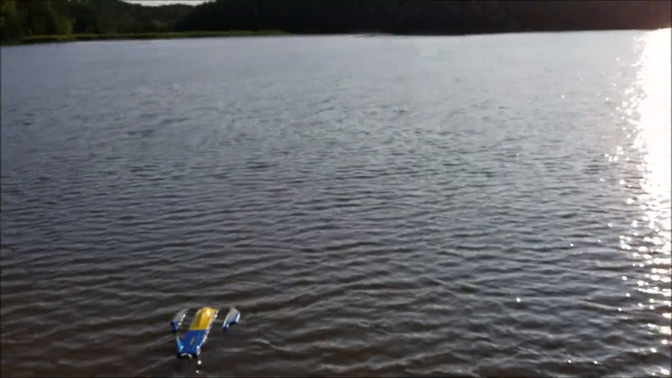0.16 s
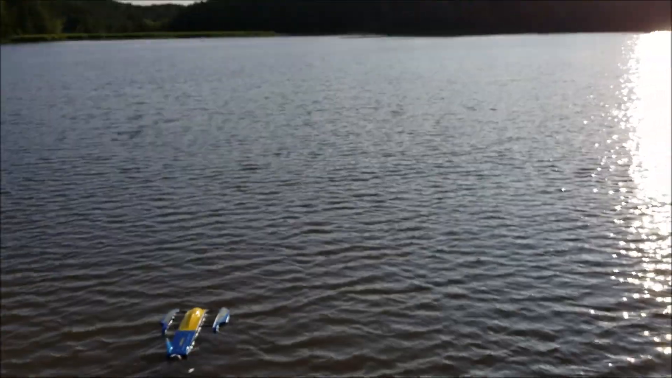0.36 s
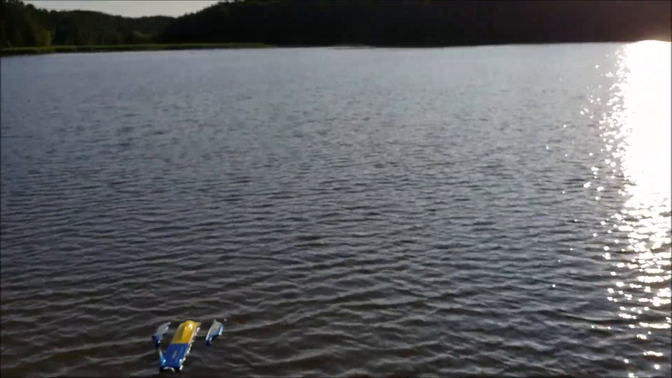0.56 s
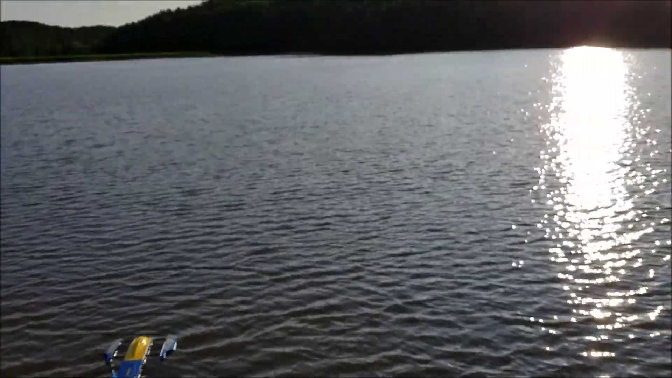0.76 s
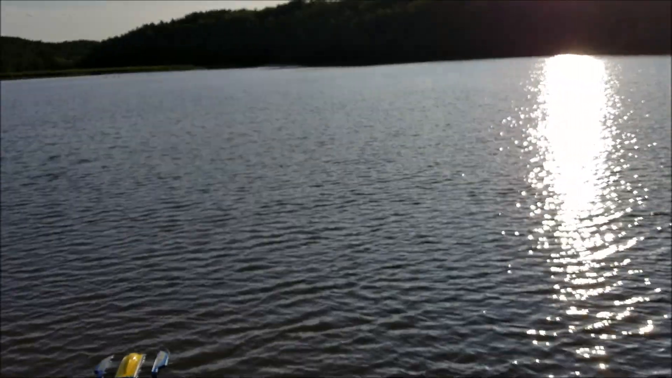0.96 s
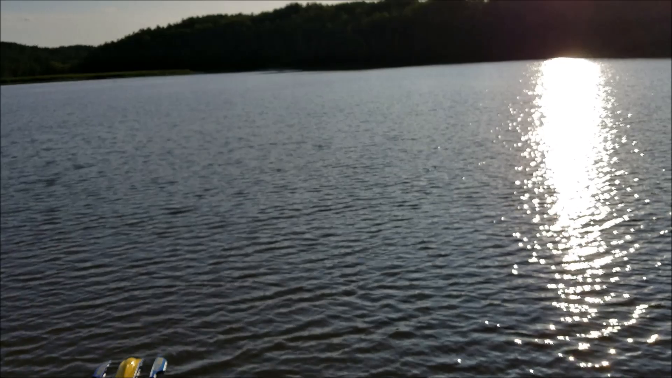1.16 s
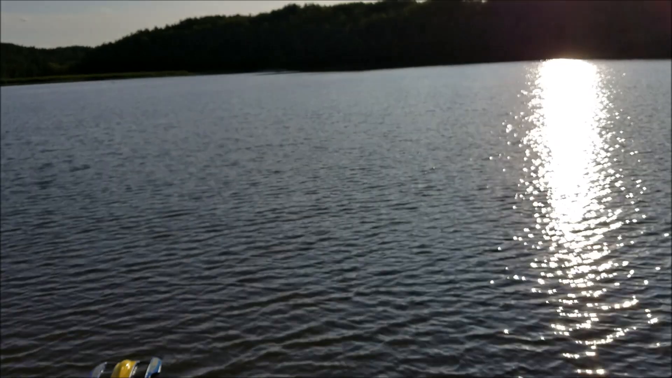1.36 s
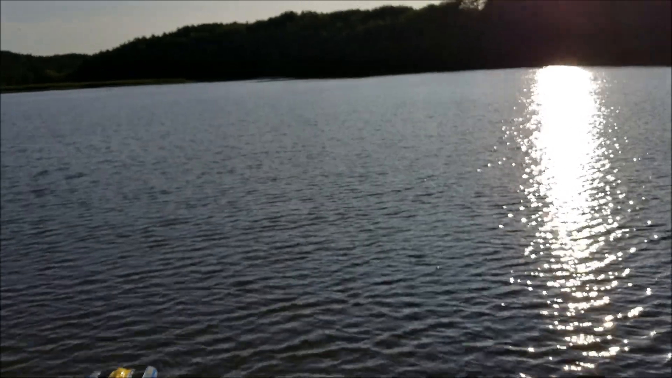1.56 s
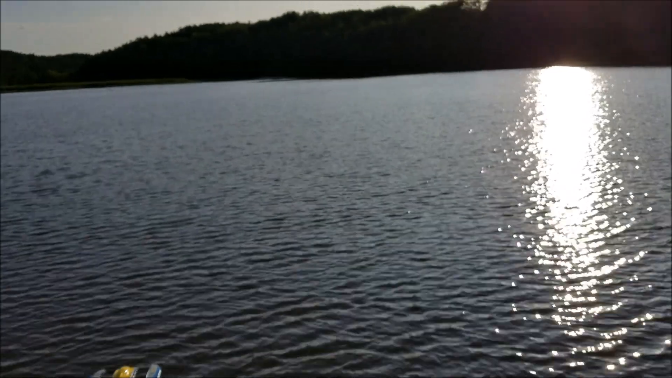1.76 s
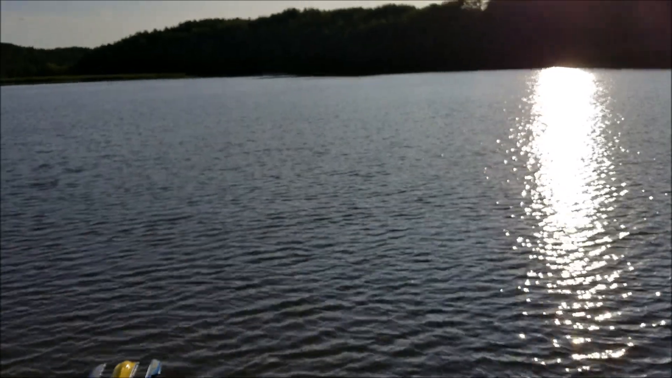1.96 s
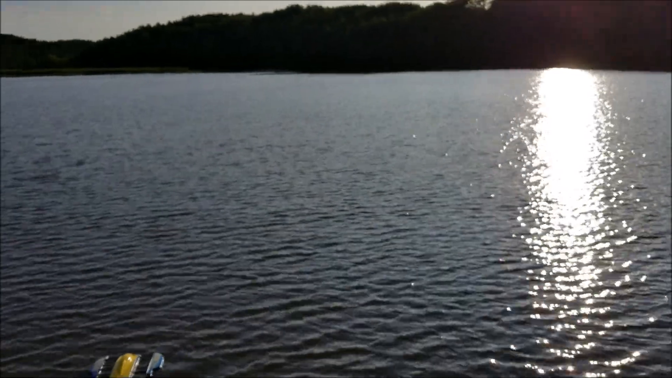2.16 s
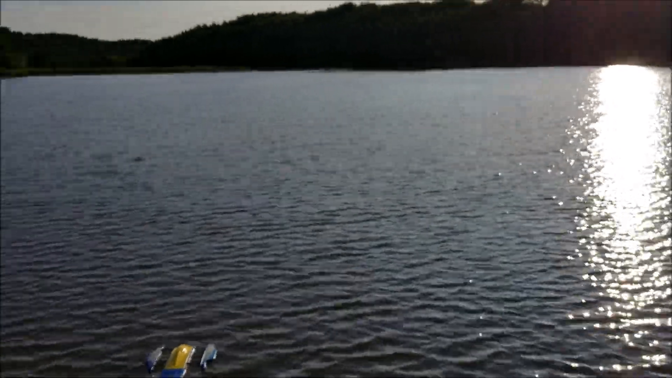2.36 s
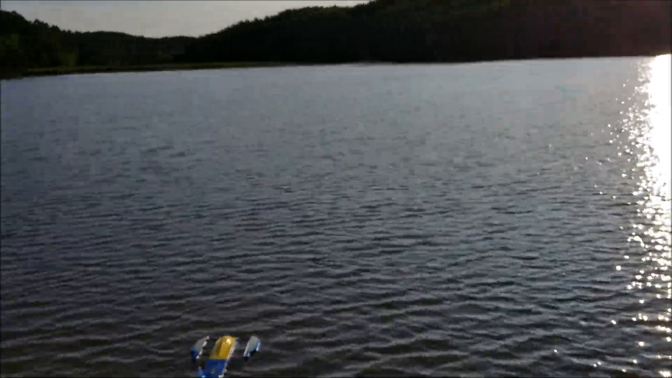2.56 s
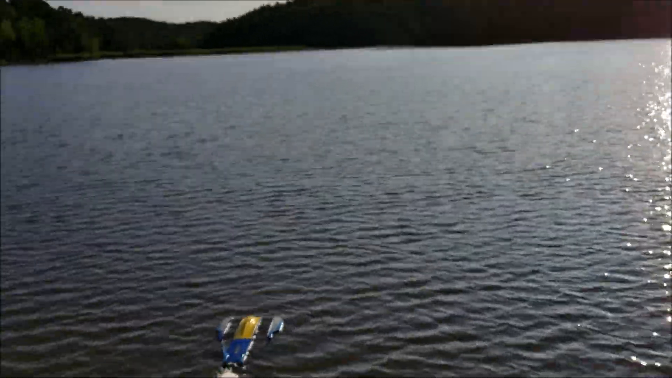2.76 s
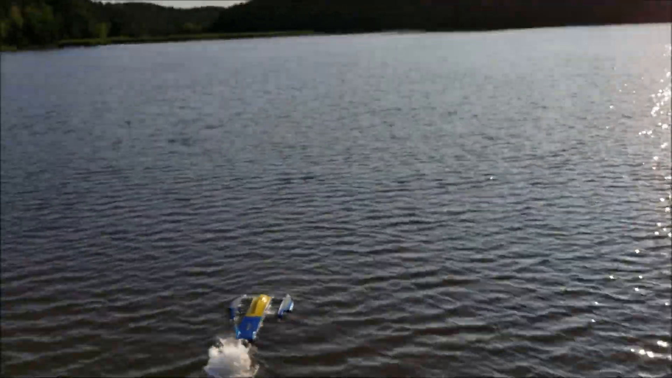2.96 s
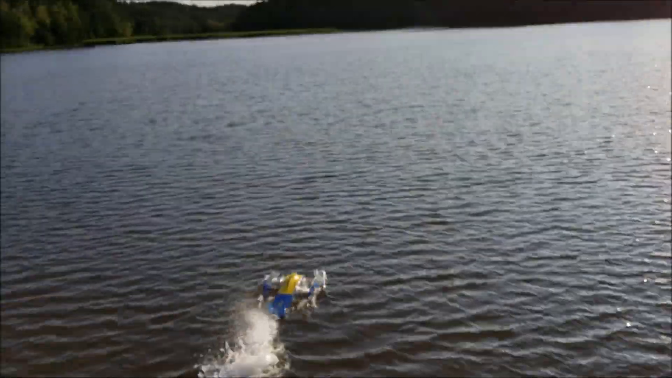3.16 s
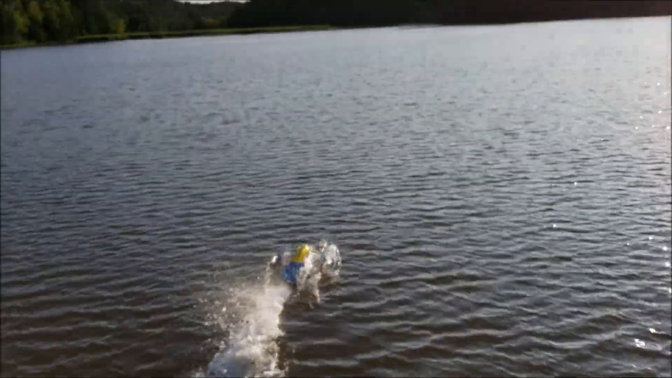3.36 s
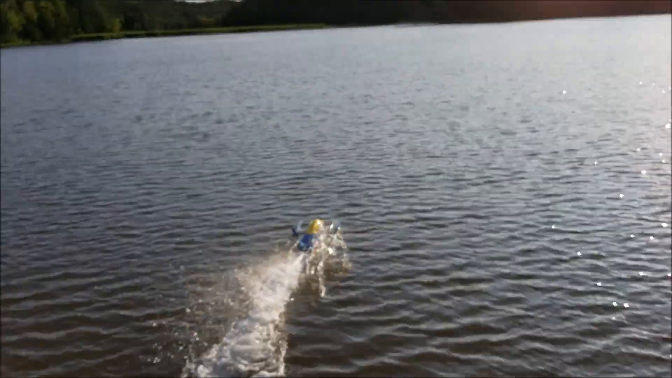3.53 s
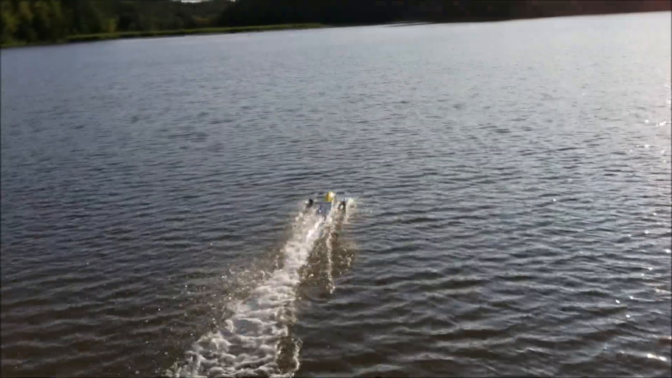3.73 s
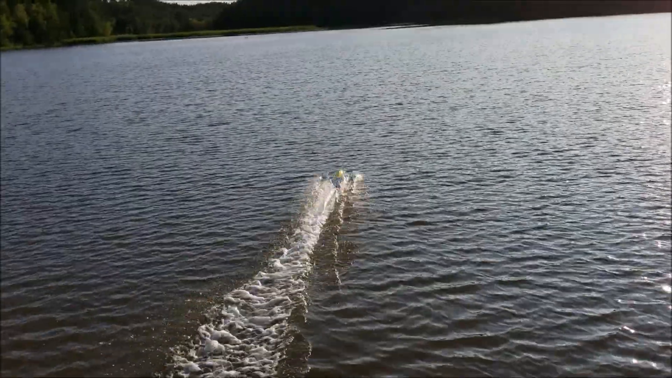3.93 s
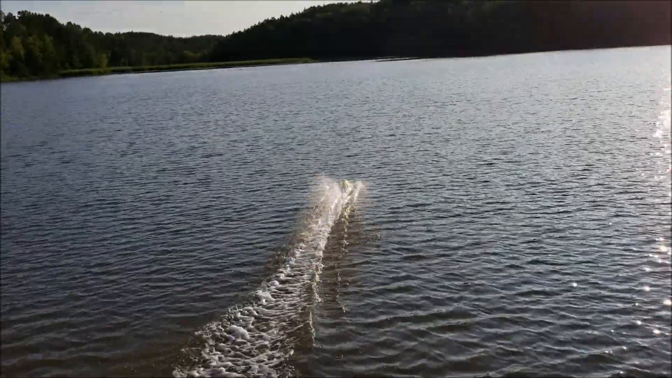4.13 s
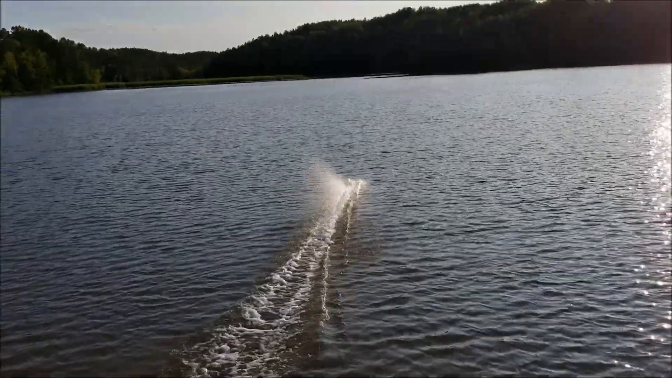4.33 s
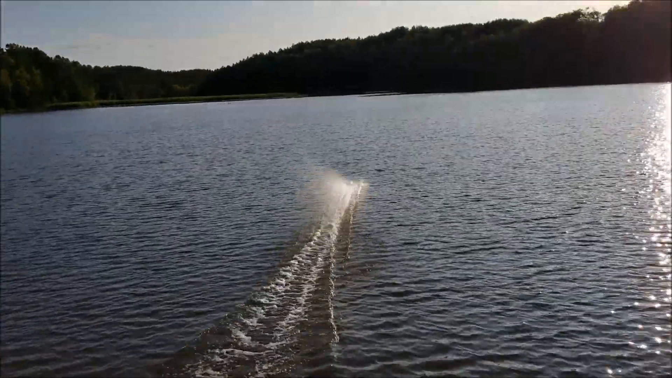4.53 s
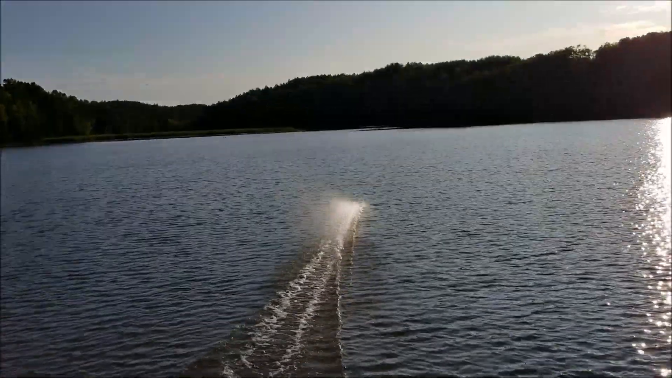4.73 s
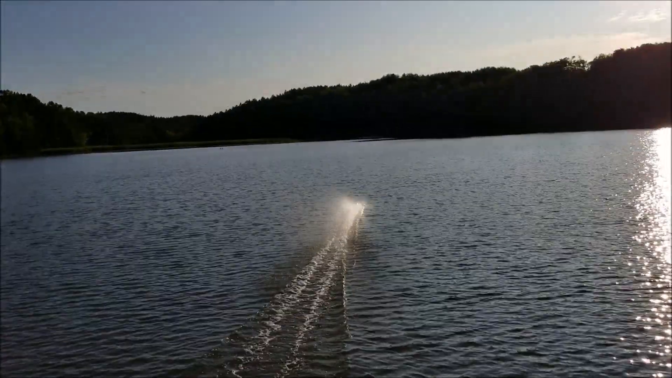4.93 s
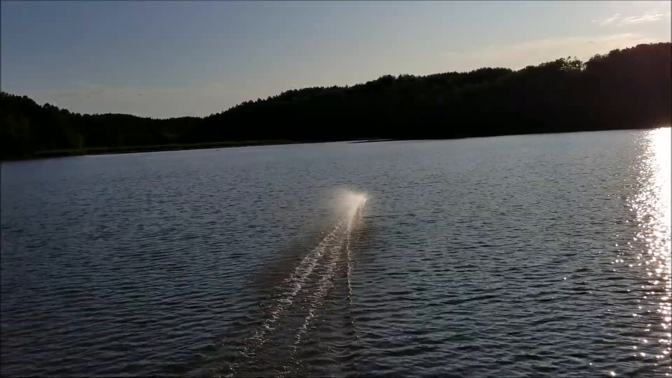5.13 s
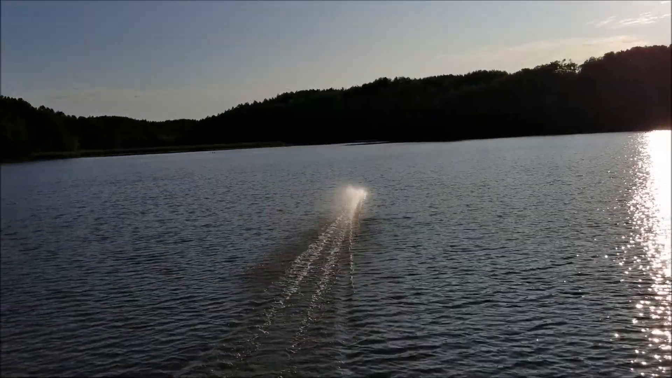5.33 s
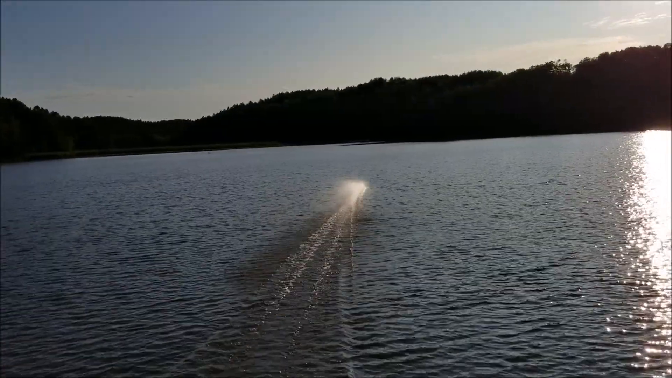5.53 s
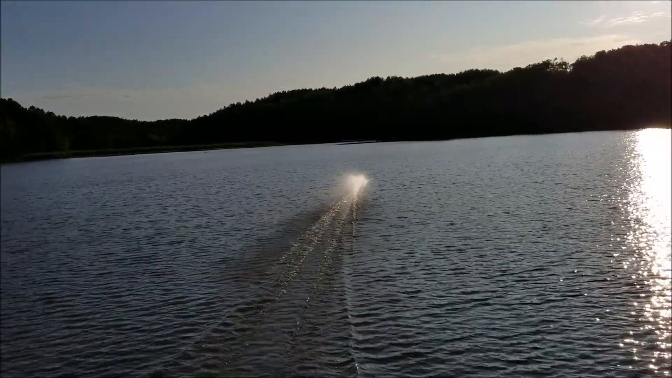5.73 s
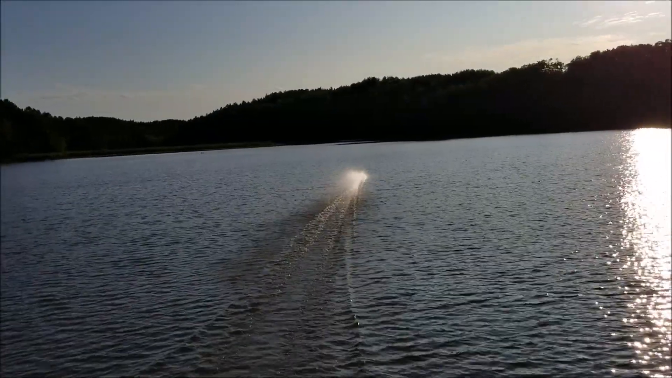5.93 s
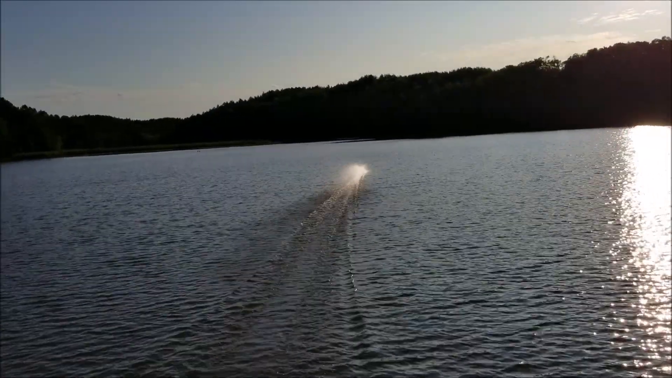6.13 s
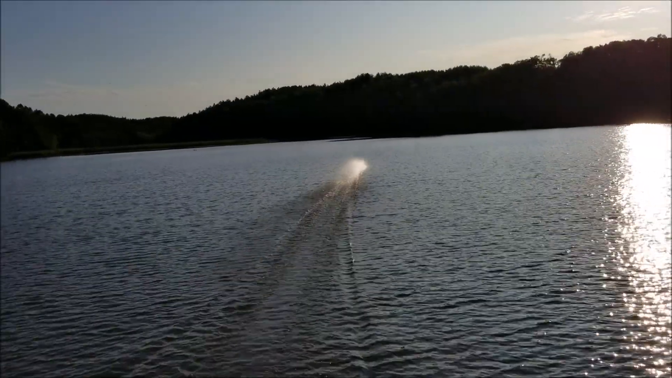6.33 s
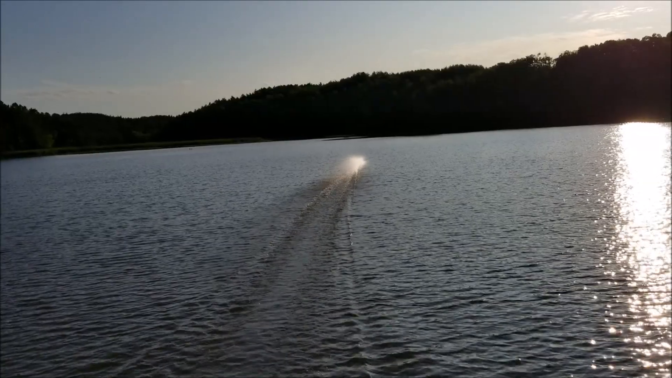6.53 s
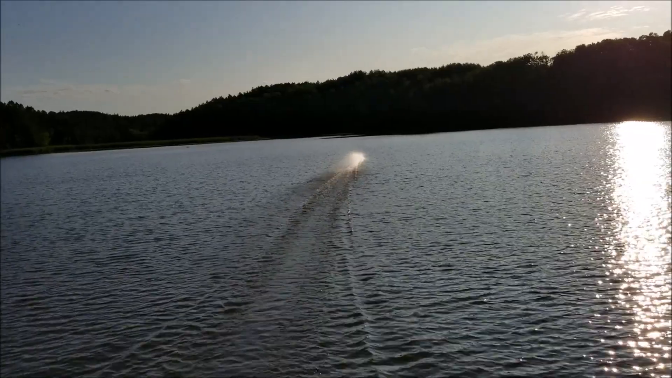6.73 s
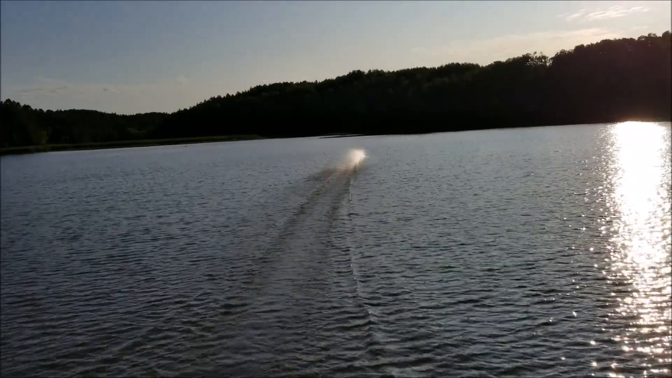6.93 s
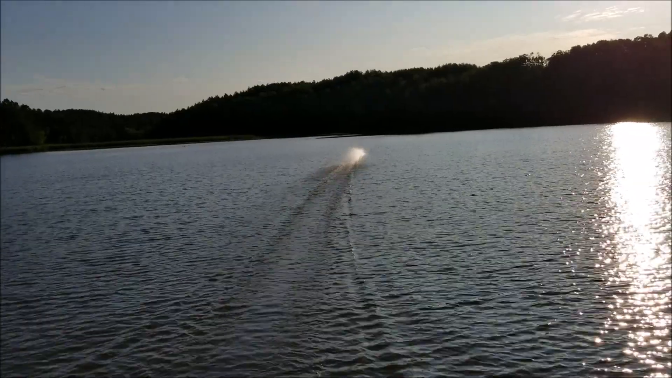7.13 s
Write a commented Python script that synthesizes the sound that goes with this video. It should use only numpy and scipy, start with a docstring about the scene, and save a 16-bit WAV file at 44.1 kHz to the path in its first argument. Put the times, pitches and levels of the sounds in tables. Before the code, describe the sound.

On a calm lake shore, light low wind, bush crickets and a few cricket chirps and ripple plops are very faint. A small model boat starts with a sharp splash close by, gulps and churns, growls hard for half a second, then jumps to a high, buzzing whine with roaring water and hissing spray, thinning as it speeds away. Stereo outdoor microphone on the bank.

```python
"""Light wind rumbles on a lake shore: filtered noise, with swept tones for insects and short bursts for ripples.
A model speedboat starts with a splash, churning the water in noise pulsed by its blades; air pockets ring as
gliding sines and droplets as tiny damped rings. The throttle opens and the propeller growls in harmonics.
The hull lifts onto the plane and whines away over pulsed roar, under a tail of spray, as its whistle fades."""
import sys
import numpy as np
from scipy import signal
from scipy.fft import rfft, irfft, next_fast_len
from scipy.io import wavfile
from scipy.ndimage import uniform_filter1d, map_coordinates

SR = 44100
rng = np.random.default_rng(int(sys.argv[2]) if len(sys.argv) > 2 else 0)


def wav_record(signal):
    """Record a signal, one row per channel, as 16-bit PCM in the file named by sys.argv[1]."""
    frames = np.transpose(np.atleast_2d(signal))
    bounded = np.clip(frames, -1, 1)
    # unit amplitude maps onto the largest positive 16-bit level
    quanta = np.round(bounded * 32767).astype(np.int16)
    wavfile.write(sys.argv[1], SR, quanta)


N = 317079
T = np.arange(N) / SR


def amp(db):
    """Decibels to gain."""
    return 10 ** (np.asarray(db) / 20)


def unit(x):
    """Scale to rms 1."""
    return x / np.sqrt(np.mean(x ** 2) + 1e-20)


def along(points, hz):
    """Read (frequency_hz, value) points on a log frequency axis."""
    f, v = np.transpose(points)
    return np.interp(np.log(hz + 1), np.log(f + 1), v)


def curves(rows):
    """One value per sample for each column after the time."""
    s, *cols = np.transpose(rows)
    return [np.interp(T, s, c) for c in cols]


def ramp(start_s, length_s):
    """Rise from 0 to 1 in a straight line."""
    return np.clip((T - start_s) / length_s, 0, 1)


def swell(centre_s, half_s):
    """A bell-shaped swell."""
    return np.exp(-.5 * np.minimum(((T - centre_s) / half_s) ** 2, 100))


def wobble(rate):
    """A smooth random curve with rate knots a second."""
    knots = rng.standard_normal(int(N * rate / SR) + 4)
    return map_coordinates(knots, [T * rate])


def turning(hz):
    """Phase of something turning at hz, in radians."""
    return 2 * np.pi * np.cumsum(hz) / SR


def filtered(x, response):
    """Filter x by a response given as a function of frequency."""
    size = next_fast_len(N + 8192)
    return irfft(rfft(x, size) * response(np.fft.rfftfreq(size, 1 / SR)), size)[..., :N]


def noise(patchy_db):
    """Two white noises sharing patches of random gain in time and frequency."""
    z = signal.stft(rng.standard_normal((2, N)), nperseg=512)[2]
    field = uniform_filter1d(rng.standard_normal(z.shape[1:]), size=7, axis=0)
    field = uniform_filter1d(field, size=8, axis=1)
    patches = amp(patchy_db * unit(field))
    return unit(signal.istft(z * patches)[1][:, :N])


def stereo(pair, spectrum, alike):
    """Colour two signals and mix them to a partly alike left and right, together of rms 1."""
    def response(hz):
        turn = np.arccos(np.clip(along(alike, hz), -1, 1)) / 2
        return amp(along(spectrum, hz)) * np.array([np.cos(turn), np.sin(turn)])
    mid, side = filtered(pair, response)
    return unit(np.array([mid + side, mid - side]))


def lines(phase, orders, rough, flutter):
    """Multiples of a turning phase, each shaken in size and timing, the higher ones more."""
    def shake(k):
        start = np.exp(2j * np.pi * rng.random())
        return start * (1 + rough * np.sqrt(k) * (wobble(flutter) + 1j * wobble(flutter)))
    return unit(sum(amp(db) * unit(np.real(shake(k) * np.exp(1j * k * phase))) for k, db in orders))


def splats(rows, low_hz, high_hz, t60):
    """Water slaps: noise bursts in a band that fall 60 dB in t60 seconds."""
    out, t = np.zeros(N + SR), np.arange(SR // 10) / SR
    band = signal.butter(2, [low_hz, min(high_hz, .45 * SR)], "band", fs=SR, output="sos")
    for start_s, peak_db in rows:
        burst = signal.sosfilt(band, rng.standard_normal(len(t)) * amp(-60 * t / t60))
        out[round(start_s * SR):][:len(t)] += amp(peak_db) * burst / np.abs(burst).max()
    return out[:N]


def placed(pair, lead):
    """Sound reaches the left port lead seconds before the right."""
    sides = zip(pair, (1, -1))
    return np.array([map_coordinates(x, [(T + side * lead / 2) * SR], order=5) for x, side in sides])


# likeness of left and right on the shore: frequency_hz, likeness (1 = identical)
SHORE_LIKENESS = [(35, 0.74), (90, 0.9), (300, 0.85), (1000, 0.85), (3000, 0.036)]
# strength of the breeze before its lift and wobble: time_s, level_db
WIND_STRENGTH = [(0, -50), (.4, -50), (1.45, -52), (1.9, -49), (3.7, -50.5), (4.7, -51), (5.6, -54),
                 (6.7, -49), (7.19, -51.5)]
# relative spectrum of the breeze: frequency_hz, level_db (per Hz)
WIND_SPECTRUM = [(12, -42), (20, -29), (50, -5.5), (92, -2.5), (237, -10.5), (275, -10.5), (305, -13),
                 (677, -23.5), (1010, -29.5), (1630, -34), (3000, -56.5), (3900, -67), (6600, -120)]


def wind():
    """Light wind: low noise that swells and falls, reaching the left first."""
    strength_db, = curves(WIND_STRENGTH)
    gusts = amp(strength_db + 2.5 + 1.23 * wobble(5.4))
    return placed(gusts * stereo(noise(patchy_db=1.5), WIND_SPECTRUM, SHORE_LIKENESS), lead=0.00038)


# relative spectrum of the bank's hiss: frequency_hz, level_db (per Hz)
BANK_SPECTRUM = [(800, -29), (1700, -5.5), (2600, -4.5), (4000, -1), (5300, 4), (6400, 0.5), (7400, -1),
                 (8300, 4), (9200, -19.5), (12000, -8.5), (15500, -6.5)]


def bank_hiss():
    """The bank hisses: steady bright noise."""
    return amp(-63.0) * stereo(noise(patchy_db=0.7), BANK_SPECTRUM, SHORE_LIKENESS)


# bush crickets, before the shore's tilt to the left; pitch and sweep sound 1 % lower:
# pitch_hz, strokes_per_s, sweep_hz, level_db
BUSH_CRICKETS = [(7340, 13.8, 495, -75.5), (8360, 16, -600, -75), (7910, 3.7, -61, -73.5),
                 (7800, 17, 697, -78), (5330, 46, -900, -75.5)]


def trills():
    """Bush crickets rasp steadily; every stroke sweeps through a narrow band at its own pitch and force."""
    out = np.zeros((2, N))
    for pitch_hz, rate, sweep_hz, level_db in BUSH_CRICKETS:
        stroke = np.cumsum(rate * (1 + .12 * wobble(rate))) / SR % 1
        phase = turning(pitch_hz * (1 + .008 * wobble(rate)) + sweep_hz * (stroke - .5))
        rasp = np.array([lines(phase, [(0.99, 0)], rough=1.0, flutter=260) for _ in range(2)])
        force = amp(1.2 * wobble(rate))
        out += amp(level_db) * unit(np.sin(np.pi * stroke) ** 4 * force * rasp)
    return out


# cricket chirps, level before each stroke's force and the shore's tilt: start_s, level_db, wing_strokes
CRICKET_CHIRPS = [(.285, -61, 3), (.843, -61, 3), (1.359, -61, 3), (1.81, -56.5, 3), (2.224, -61, 3),
                  (6.15, -60, 1), (6.345, -58, 1), (6.495, -58, 2), (6.853, -57, 2)]


def cricket(hz=4450, fall_hz=150, stroke_gap=.043, half=0.0054):
    """A few wing strokes to a chirp, each sliding down in pitch, the later ones on average stronger."""
    out, t = np.zeros(N + SR), np.arange(SR // 25) / SR
    u = (t - .01) / half
    for start_s, level_db, strokes in CRICKET_CHIRPS:
        for k in range(round(strokes)):
            tune, slide, force = rng.standard_normal(3)
            pitch = hz * (1 + 0.0085 * tune) - fall_hz * (1 + 0.41 * slide) * np.tanh(u / 2)
            stroke = np.exp(-u * u / 2) * np.sin(turning(pitch))
            at = round((start_s + k * stroke_gap) * SR)
            out[at:][:len(t)] += amp(level_db + 1.3 * k + force) * stroke
    return out[:N]


# ripples plop at the shore, before its tilt to the left: start_s, peak_db
RIPPLES = [(.385, -56), (.99, -56), (1.502, -61), (1.54, -59), (1.728, -51), (1.739, -50), (1.757, -54)]


def laps():
    """Ripples plop: short bursts of noise in a narrow band."""
    return splats(RIPPLES, low_hz=1200, high_hz=2460, t60=.03)


def shore():
    """Wind reaches the left first; hiss, insects and ripples are louder on the left."""
    tilt = amp([[1.0], [-1.0]])
    return wind() + (bank_hiss() + trills() + cricket() + laps()) * tilt


# the run: the motor starts to tick over, the throttle opens, the hull lifts onto the plane (s)
START_S, GO_S, LIFT_S = 2.566, 2.893, 3.545
OPEN_S, DIG_S, CLEAR_S = 0.016, 0.41, 0.021  # the throttle opens, the load builds, the blades clear the water (s)
# distance at rest (m), top speed (m/s), time constant of the acceleration (s)
START_M, TOP_M_PER_S, PICKUP_S = 3.14, 13.26, 1.0
NEAR_M = 6.51  # levels change with distance only beyond this


def speed():
    """The boat picks up speed ever more slowly towards its top (m/s)."""
    return TOP_M_PER_S * (1 - np.exp(-np.maximum(T - GO_S, 0) / PICKUP_S))


def distance():
    """It heads straight away from the shore (m)."""
    return START_M + np.cumsum(speed()) / SR


def receding(doubling_db):
    """Gain that changes by so many dB with each doubling of distance."""
    return amp(doubling_db * np.log2(np.maximum(distance() / NEAR_M, 1)))


def effort(idle_db, open_db, full_db):
    """Gain that follows the motor: ticking over, a jump as the throttle opens, then a climb to full load."""
    opening = (open_db - idle_db) * ramp(GO_S, OPEN_S)
    loading = (full_db - open_db) * ramp(GO_S, DIG_S)
    return ramp(START_S, .008) * amp(idle_db + opening + loading)


# the hull ploughs into ripples, and roar and spray surge: centre_s, gain_db, half_length_s
RIPPLE_SURGES = [(3.646, 2, 0.027), (4.306, 2.2, 0.042), (4.68, 1.5, .11), (5.99, 2.5, .06),
                 (6.346, 1.5, 0.14), (6.749, 1.5, 0.12)]


def surge():
    """Gain of the water noise as the hull meets ripples."""
    return amp(sum(db * swell(s, half) for s, db, half in RIPPLE_SURGES))


# likeness of left and right in the boat's water noise: frequency_hz, likeness (1 = identical)
BOAT_LIKENESS = [(100, 1), (600, 0.94), (2000, .9), (5000, 0.77), (14000, 0.4)]
# relative spectrum of the churn at rest: frequency_hz, level_db (per Hz)
RESTING_CHURN = [(40, -26), (100, -6.5), (330, 3.5), (550, -6.5), (1150, -8), (1550, -22), (2000, -14),
                 (2800, -18.5), (3600, -41), (9000, -45)]
# relative spectrum of the churn under load: frequency_hz, level_db (per Hz)
DRIVING_CHURN = [(40, -40), (90, -24), (150, -2.5), (310, 3.5), (480, -2.5), (800, -3.5), (1200, -11.5),
                 (1450, -19), (1850, -6), (2400, -14), (3300, -32), (7500, -21.5), (10000, -43)]


def churn(beats, load):
    """Blades churn the water: steady noise at rest, noise pulsed at each blade pass under load."""
    resting = stereo(noise(patchy_db=4.0), RESTING_CHURN, BOAT_LIKENESS)
    driving = stereo(beats * noise(patchy_db=2.5), DRIVING_CHURN, BOAT_LIKENESS)
    level = effort(idle_db=-40.5, open_db=-30, full_db=-24.5)
    return level * (np.sqrt(1 - load) * resting + np.sqrt(load) * driving)


# the blades throw up a burst of water: centre_s, churn_db, spray_db, half_length_s
BLADE_BITES = [(2.612, -34, -52, .018), (2.875, -56, -45.5, 0.019), (2.92, -20.5, -33, .011),
               (3.051, -20.5, -31.5, 0.016), (3.119, -23, -34, 0.0058), (3.193, -29, -31.5, 0.015),
               (3.248, -23, -34.5, 0.03)]
# relative spectrum of a bite of the blades: frequency_hz, level_db (per Hz)
BITE_SPECTRUM = [(60, -31), (150, -5), (330, 0.5), (600, 0), (900, 0), (1200, -4), (1500, -14.5),
                 (1950, -7.5), (2800, -10), (3600, -25), (9000, -33)]


def bites(beats):
    """The blades bite: brief swells of pulsed noise."""
    level = sum(amp(churn_db) * swell(s, half) for s, churn_db, _, half in BLADE_BITES)
    return level * stereo(beats * noise(patchy_db=2.5), BITE_SPECTRUM, BOAT_LIKENESS)


# harmonics of the growl: multiple_of_blade_rate, level_db (relative)
GROWL_HARMONICS = [(1, 3.5), (1.5, -22), (2, 1), (2.5, -11), (3, -5.5), (4, -2.5), (5, -7.5), (6, -36),
                   (7, -19)]


def growl(phase, load):
    """Submerged blades thump out rough multiples of their rate, coming in with the load."""
    level = load * effort(idle_db=-33.5, open_db=-33.5, full_db=-21)
    return level * lines(phase, GROWL_HARMONICS, rough=0.38, flutter=50)


# the propeller labours under water and sags just before the hull lifts, plus a small wobble:
# time_s, blade_rate_hz
LABOURING_BLADES = [(2.99, 145.1), (3.08, 176.8), (3.28, 166.8), (3.39, 184.2), (3.51, 168.9),
                    (3.56, 142.5)]


def launch():
    """One turning propeller paces the churn, bites and growl until the blades clear the water."""
    hz, = curves(LABOURING_BLADES)
    phase = turning(hz * (1 + 0.0201 * wobble(50)))
    load = ramp(2.93, 0.11)  # the stern digs in
    beats = unit(np.exp(0.23 * np.cos(phase)) * amp(0.81 * wobble(130)))
    under_water = 1 - ramp(LIFT_S, CLEAR_S)
    return under_water * (churn(beats, load) + bites(beats) + growl(phase, load))


# air pockets ringing behind the propeller: centre_s, pitch_hz, glide_octaves_per_s, level_db, half_length_s
AIR_POCKETS = [(2.592, 200, 8.5, -35, 0.014), (2.823, 291, -10, -40.5, 0.015),
               (2.936, 365.3, 21, -22, .014), (3.053, 320, -15.5, -17, .012), (3.046, 715, -2, -26.5, .018),
               (3.226, 275, 5.5, -22, .014), (3.24, 800, 2, -21.5, .026), (3.377, 550, 4, -20.5, 0.02)]


def gulps():
    """Pockets of air ring briefly and glide as they change size."""
    out = np.zeros(N)
    for centre_s, pitch_hz, glide, level_db, half_s in AIR_POCKETS:
        pitch = pitch_hz * 2 ** (glide * np.clip(T - centre_s, -2 * half_s, 2 * half_s))
        ring = np.sqrt(2) * np.sin(turning(pitch))  # rms 1
        out += amp(level_db) * swell(centre_s, half_s) * ring
    return out


def drops(cycles, spread_db, count):
    """Droplets hitting water: tiny damped rings of scattered pitch and size, white overall."""
    when, pitch, size = rng.random((count, 3)).T[:, :, None]
    hz, n = 1200 * 13 ** pitch, np.arange(64)
    weight = hz * amp(-spread_db * np.log(size + .004))
    rings = weight * np.sin(2 * np.pi * hz * n / SR) * np.exp(-hz * n / SR / cycles)
    places = (when * N).astype(int) + n
    return unit(np.bincount(places.ravel(), rings.ravel(), N)[:N])


WASH_DB, WASH_AT_S, WASH_T60_S = -37, 2.597, 0.32  # the first splash rains back down
# relative spectrum of the spray: frequency_hz, level_db (per Hz)
SPRAY_SPECTRUM = [(700, -37), (1800, 1.5), (3400, 0.5), (4500, 1.5), (5500, -1.5), (6800, 0), (7700, -3.5),
                  (8800, -10), (11000, -8), (12700, -6.5), (14000, -7), (16000, -6)]


def spray():
    """Thrown water falls back as clumped droplets in a fine hiss; far off, the hull's skips spatter through."""
    motor = effort(idle_db=-57.5, open_db=-36.5, full_db=-36)
    tail = ramp(WASH_AT_S, .03) * motor * surge() * receding(-9.5)
    decay = amp(WASH_DB - 60 * np.maximum(T - WASH_AT_S, 0) / WASH_T60_S)
    wash = ramp(WASH_AT_S - .005, 0.006) * decay
    thrown = sum(amp(spray_db) * swell(s, half) for s, _, spray_db, half in BLADE_BITES)
    level = np.hypot(tail + wash, thrown)
    grains = np.array([drops(cycles=0.71, spread_db=3.5, count=24000) for _ in range(2)])
    kicks = (rng.random(N) < 90 / SR) * 2.5 * rng.random(N) ** 2  # about 90 a second
    skips = signal.lfilter([1], [1, -np.exp(-1 / (0.0027 * SR))], kicks)  # sudden rise, quick fall
    spatter = 1 + (.25 + .7 * ramp(6.4, .9)) * skips
    clumps = amp(1.1 * wobble(260) + 0.49 * wobble(35)) * spatter
    return level * stereo(clumps * (grains + 1.17 * noise(patchy_db=3.5)), SPRAY_SPECTRUM, BOAT_LIKENESS)


# single sharp splats, before a 1 dB lift: start_s, peak_db
SHARP_SPLATS = [(2.5958, -16), (2.6, -15.5), (4.3043, -27), (4.803, -30), (5.0394, -37), (5.9687, -32.5),
                (6.25, -42), (6.335, -40)]


def splashes():
    """Water slaps sharply: broad bursts that die at once."""
    return amp(1.0) * splats(SHARP_SPLATS, low_hz=1800, high_hz=15400, t60=0.0088)


def controller():
    """Switched motor current makes the windings sing; Doppler shift lowers the whistle as the boat speeds away."""
    hz = 7815 / (1 + speed() / 343)  # pitch at rest (Hz), speed of sound (m/s)
    level = amp(-51) * ramp(2.84, .02) * receding(-17.5)
    return level * lines(turning(hz), [(1, 0)], rough=.9, flutter=90)


# overtones of the whine: multiple_of_blade_rate, level_db (relative)
WHINE_OVERTONES = [(1.5, -3.5), (2, -3.5), (3, -12.5), (4, -11)]


def whine(phase):
    """Blades slap the surface in a tone whose overtones gain on it with distance."""
    overtones = lines(phase, WHINE_OVERTONES, rough=.3, flutter=40)
    return lines(phase, [(1, 0)], rough=0.16, flutter=60) + amp(-23) * receding(4) * overtones


def shaft(phase):
    """The shaft drones at half the blade rate for a moment as the hull settles."""
    return amp(-38) * swell(4.29, 0.31) * lines(phase, [(.5, 0)], rough=0.41, flutter=30)


# relative spectrum of the roar close by: frequency_hz, level_db (per Hz)
NEAR_SPECTRUM = [(60, -30), (170, -4), (300, -0.5), (430, -0.5), (600, -1), (820, -4.5), (1050, -10),
                 (1270, -16.5), (1550, -9.5), (2100, -14), (3000, -19), (5000, -37.5)]
# relative spectrum of the roar far out: frequency_hz, level_db (per Hz)
FAR_SPECTRUM = [(60, -25), (170, -7.5), (300, -4.5), (450, -3.5), (610, 0), (780, -5.5), (1000, -14),
                (1280, -20), (1620, -15.5), (1900, -20.5), (2250, -18.5), (2750, -30), (5000, -42)]


def roar(phase):
    """Slapped water roars in uneven pulses, changing colour and thinning with distance."""
    slaps = unit(np.exp(0.29 * np.cos(phase / 2)) * amp(2.15 * wobble(220) + 0.39 * wobble(14)))
    far = ramp(4.434, 1.13)
    near_roar = amp(5.5) * stereo(slaps * noise(patchy_db=1.5), NEAR_SPECTRUM, BOAT_LIKENESS)
    far_roar = amp(4.0) * stereo(slaps * noise(patchy_db=1.5), FAR_SPECTRUM, BOAT_LIKENESS)
    level = amp(-39.5) * surge() * receding(-2)
    return level * (np.sqrt(1 - far) * near_roar + np.sqrt(far) * far_roar)


# the boat on the plane, before a small wobble and a 0.25 dB trim: time_s, blade_rate_hz, tone_db
PLANING_BLADES = [(3.58, 599.6, -37), (3.64, 641, -39), (3.92, 581, -35), (3.99, 535.3, -38),
                  (4.08, 540, -37), (4.16, 573.7, -41.5), (4.42, 557, -37.5), (4.72, 555.7, -34.9),
                  (4.85, 552, -38), (5.3, 557.8, -37.5), (5.6, 552.5, -40), (5.8, 542, -37.5),
                  (6.05, 549, -37), (6.5, 546.6, -38), (7.19, 539, -42.5)]


def planing():
    """Blades at the surface pace the whine, the shaft's drone and the roar once the hull has lifted."""
    hz, tone_db = curves(PLANING_BLADES)
    phase = turning(hz * (1 + 0.0038 * wobble(25)))
    tone = amp(tone_db - 0.25) * whine(phase)
    return ramp(LIFT_S, CLEAR_S) * (tone + shaft(phase) + roar(phase))


def scene():
    """The boat heads away from the shore, drifting from just left of centre to just right."""
    boat = launch() + gulps() + spray() + splashes() + controller() + planing()
    lead_start_s, lead_far_s = .00005, -0.000037  # the left port's lead at the shore and in the far limit
    lead = lead_far_s + (lead_start_s - lead_far_s) * START_M / distance()
    return shore() + placed(boat, lead)


# the two microphone ports differ: frequency_hz, left_minus_right_db
PORT_DIFFERENCE = [(200, 1.5), (5000, 2.5), (6800, 3.5), (8600, -3), (10500, 1.5), (15000, 1.5)]


def record(dry):
    """Each port colours its channel, and nothing passes at or above 15900 Hz."""
    def response(hz):
        sides_db = np.outer([.5, -.5], along(PORT_DIFFERENCE, hz))
        return amp(sides_db) * (hz < 15900)
    return filtered(dry, response)


dry = scene()
out = record(dry)
wav_record(out)
```